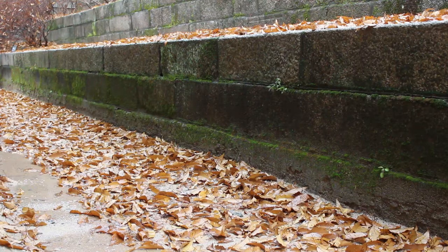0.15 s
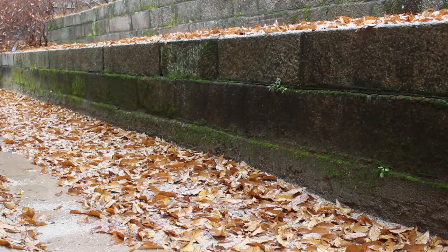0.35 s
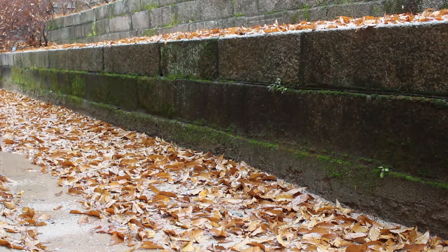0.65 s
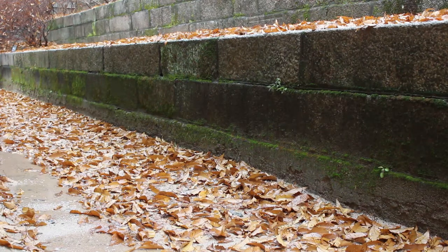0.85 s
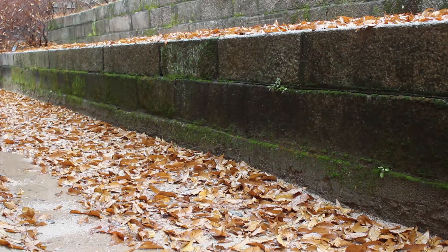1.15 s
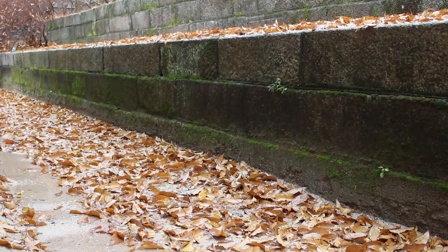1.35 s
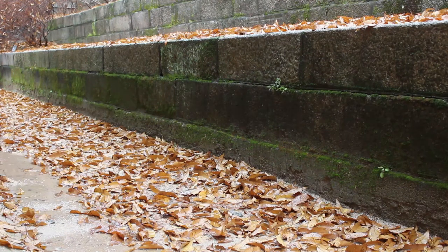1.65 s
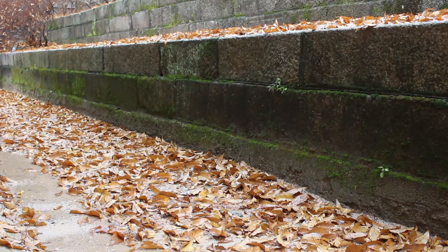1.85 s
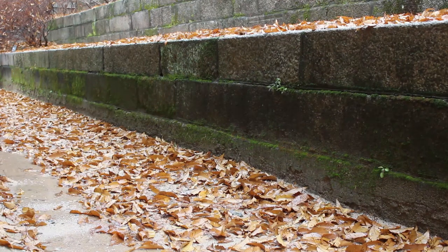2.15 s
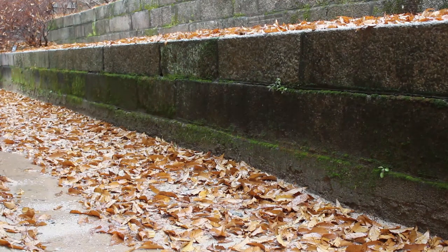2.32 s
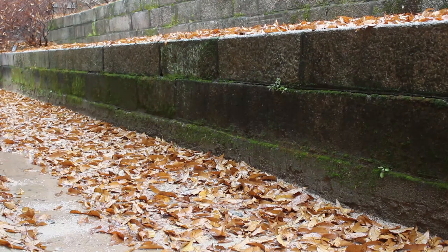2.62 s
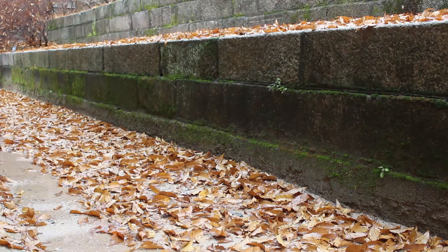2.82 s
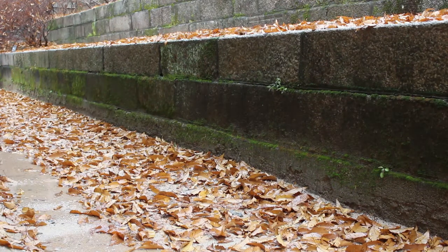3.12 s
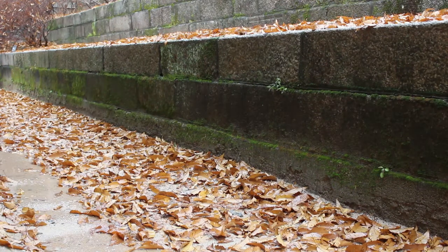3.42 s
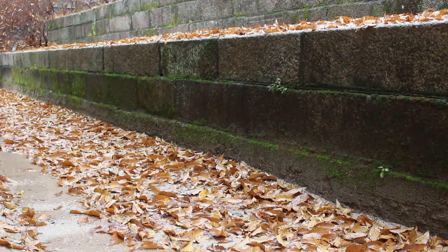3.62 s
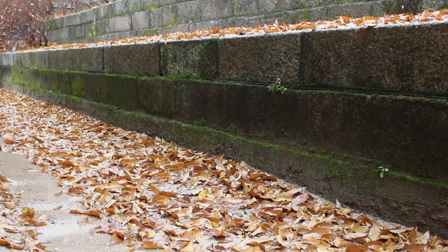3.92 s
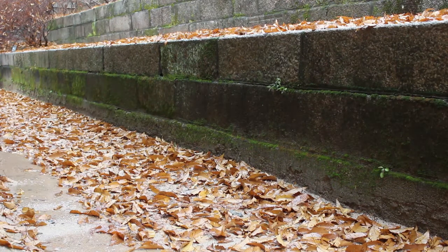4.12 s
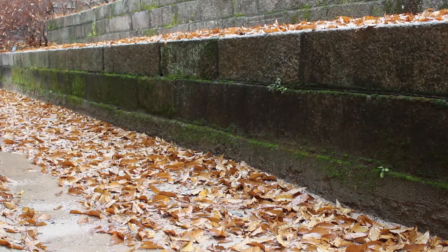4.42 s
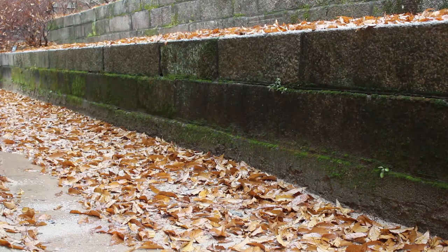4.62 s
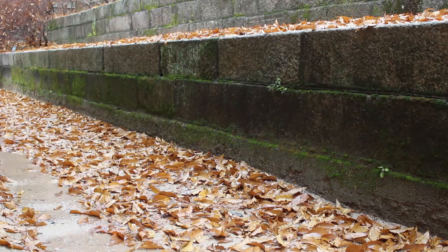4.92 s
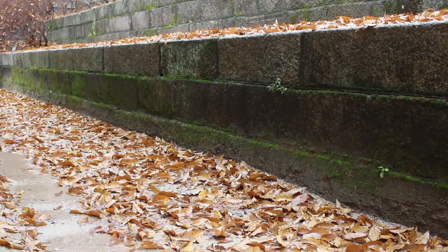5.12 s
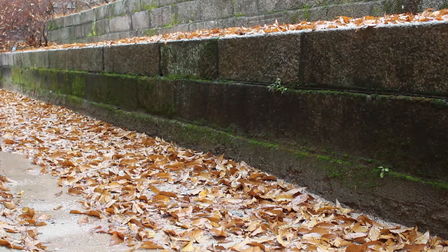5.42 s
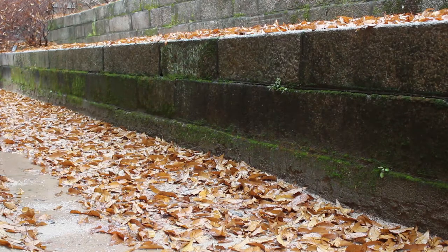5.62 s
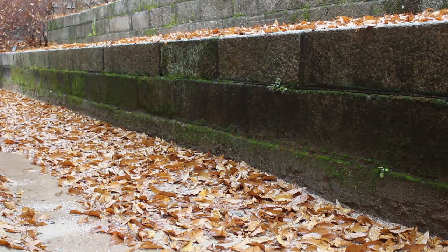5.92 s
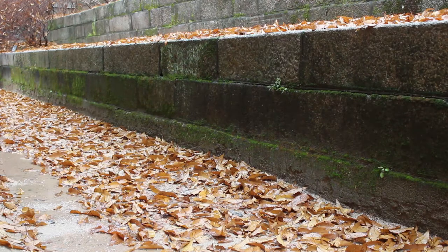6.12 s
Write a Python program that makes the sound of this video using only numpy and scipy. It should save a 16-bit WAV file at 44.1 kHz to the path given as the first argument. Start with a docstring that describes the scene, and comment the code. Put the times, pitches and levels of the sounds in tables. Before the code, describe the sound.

A quiet, steady light rain lasts just over six seconds, a soft muffled wash with fine patter. Close drops tap wet leaves and plop in shallow water at uneven intervals, each very short and dry. Around 0.6-0.9 s a bird gives two soft, slightly sinking whistles, followed by high rising chirps until 1.4 s, while a firmer drop lands at 1.35 s. From 1.75 to 4.1 s a hoarse, rising churr repeats among quick slurred chirps, echoing from trees, as flurries of droplets spatter the litter from about 2 s. The loudest smack comes at 3.2 s, another plop at 3.5 s. Brighter chirps cluster at 4.6-5 s, strongest first. Heavy drops hit at 5.2 and 5.4 s; one last chirp follows at 5.55 s, then scattered drips and small spatters. Faint low air rumble and hiss lie beneath; the courtyard adds short dull reflections, almost mono.

```python
"""Light rain in a stone courtyard strewn with wet leaves: fat drops smack on leaves and puddles close by.
Fine rain patters all round, showers of droplets spatter the litter and birds call from echoing trees.
Drops are impacts that excite damped resonances; the rain is shaped noise and random ticks.
The birds are gliding sines with a random quaver. Low rumble and faint hiss lie beneath; it is almost mono."""
import sys
import numpy as np
from scipy import signal
from scipy.fft import rfft, irfft, next_fast_len
from scipy.io import wavfile

SR = 44100
rng = np.random.default_rng(int(sys.argv[2]) if len(sys.argv) > 2 else 0)


def materialize(psi):
    """Save the field psi as 16-bit PCM at rate SR to the path in sys.argv[1].

    A 1-D psi becomes a single channel; in a 2-D psi each row is a channel.
    """
    bounded = np.clip(np.atleast_2d(psi).T, -1, 1)
    quanta = np.round(bounded * 32767).astype(np.int16)
    wavfile.write(sys.argv[1], SR, quanta)


N = 276066
TIME = np.arange(N) / SR


def from_db(db):
    """Decibels to gain."""
    return 10 ** (np.asarray(db) / 20)


def rms_one(x):
    """Scale to rms 1."""
    return x / np.sqrt(np.mean(x ** 2) + 1e-20)


def unit_energy(x):
    """Scale a short sound to energy 1."""
    return x / np.linalg.norm(x)


def in_time(rows):
    """Each column of a curve at every sample."""
    s, *columns = np.transpose(rows)
    return [np.interp(TIME, s, c) for c in columns]


def band(x, low_hz, high_hz, order=2):
    """Causal band-pass."""
    sections = signal.butter(order, [low_hz, min(high_hz, .45 * SR)], "band", fs=SR, output="sos")
    return signal.sosfilt(sections, x + 1e-18)


def resonate(x, hz, width_hz):
    """A two-pole resonance with gain about 1 at its peak."""
    r = np.exp(-np.pi * width_hz / SR)
    zeros = np.array([1, 0, -1]) * (1 - r * r) / 2
    poles = [1, -2 * r * np.cos(2 * np.pi * hz / SR), r * r]
    return signal.lfilter(zeros, poles, x + 1e-18)


def coloured(x, spectrum):
    """Filter a sound by a smooth curve over log frequency; rms 1."""
    hz, db = np.transpose(spectrum)
    size = next_fast_len(N)
    bins = np.maximum(np.fft.rfftfreq(size, 1 / SR), 1)
    gain = from_db(np.interp(np.log(bins), np.log(hz), db))
    return rms_one(irfft(rfft(x, size) * gain, size)[..., :N])


def wander(count, rate):
    """Random motion in straight lines between normal draws, `rate` draws a second."""
    knots = np.arange(count) * rate / SR
    return np.interp(knots, np.arange(count), rng.standard_normal(count))


def add(out, s, sound):
    """Mix a sound in at a time."""
    start = max(round(s * SR), 0)
    out[start:start + len(sound)] += sound[:max(N - start, 0)]


def reverb(x, t60, low_hz, high_hz, build_s):
    """Diffuse scatter: a noise tail of unit energy that builds up and dies away."""
    t = np.arange(SR) / SR
    noise = band(rng.standard_normal(SR), low_hz, high_hz, order=1)
    tail = noise * from_db(-60 * t / t60) * (1 - np.exp(-t / build_s))
    return signal.fftconvolve(x, unit_energy(tail))[:N]


def courtyard(x):
    """Ground and wall send back dull early echoes, then a faint tail."""
    # reflections from ground and wall: (delay [s], level [dB])
    echoes = [(.0048, -17.5), (.0095, -14.5)]
    dull = band(x, 470, 2040)
    early = sum(from_db(db) * np.interp(TIME - delay, TIME, dull, left=0) for delay, db in echoes)
    tail = from_db(-25.5) * reverb(x, t60=0.33, low_hz=500, high_hz=4500, build_s=0.026)
    return x + early + tail


def hiss():
    """A faint treble-heavy noise, with opposite polarity in the two channels."""
    # spectrum of the hiss: (frequency [Hz], relative level [dB])
    hiss_colour = [(2000, -21), (5000, -25), (8000, 3), (12000, 3), (16000, 3.5)]
    return from_db(-64.0) * coloured(rng.standard_normal(N), hiss_colour) * np.array([[1], [-1]])


def air_rumble():
    """Air moving past the microphone makes a low noise that swells and sinks."""
    # strength of the moving air: (time [s], level before a steady lift [dB])
    air = [(0.0, -65), (1.24, -49.5), (2.16, -58), (3.49, -57.5), (3.57, -46), (4.01, -53.5), (4.73, -54),
           (4.78, -49), (4.9, -53.5), (5.32, -54), (5.51, -61.5), (6.26, -55)]
    # spectrum of the rumble: (frequency [Hz], relative level [dB])
    rumble_colour = [(15, 1), (28, 3), (52, 0.5), (75, -3.5), (120, -21.5), (220, -45.5)]
    rumble_db, = in_time(air)
    return from_db(rumble_db + 2.5) * coloured(rng.standard_normal(N), rumble_colour)


def patter(per_s, spread_db, low_hz, high_hz, q, count=16):
    """Small drops fall at random, each a click that rings briefly on one of a set of damped leaves."""
    sizes = from_db(spread_db * np.minimum(rng.exponential(1, N), 3.5)) * rng.choice([-1, 1], N)
    clicks = sizes * (rng.random(N) < per_s / SR)
    leaf = rng.integers(0, count, N)
    pitches = np.geomspace(low_hz, min(high_hz, .4 * SR), count)
    ticks = sum(resonate(clicks * (leaf == k), hz, hz / q) for k, hz in enumerate(pitches))
    return rms_one(ticks + from_db(-15.0) * clicks)


def rain():
    """Far rain merges to a wash of noise; nearer drops stay apart as a fine patter."""
    # the surrounding rain: (time [s], level shared by wash and patter before their mix [dB])
    rainfall = [(0, -45), (.5, -46.5), (1.1, -45), (1.9, -45.5), (2.5, -45.5), (2.95, -44), (3.35, -46.5),
                (3.8, -43.5), (4.4, -45), (4.85, -43.5), (5.35, -45.5), (5.9, -46), (6.26, -45.5)]
    # spectrum of the rain: (frequency [Hz], relative level [dB])
    rain_colour = [(59, -61), (100, -4.5), (166, -7), (271, -8.5), (381, -0.5), (513, -1), (648, -1),
                   (930, -2), (1390, -2), (1650, -7.5), (3120, -11.5), (5300, -13), (6420, -19.5),
                   (14400, -27), (16000, -29)]
    rain_db, = in_time(rainfall)
    wash = coloured(rng.standard_normal(N), rain_colour)
    ticks = courtyard(patter(per_s=260, spread_db=4.5, low_hz=414, high_hz=12500, q=1.7))
    grains = coloured(ticks, rain_colour)
    return from_db(rain_db) * (from_db(0.67) * wash + from_db(-5.0) * grains)


def song(notes, quaver_hz=380, quaver_rate=900, flutter_db=2.5, second_db=-4.0, second_voice_ratio=1.13):
    """Whistled glides; hoarseness adds a fast quaver and a second voice from the other side of the syrinx."""
    out = np.zeros(N)
    quaver, flutter = wander(N, quaver_rate), wander(N, 90)
    for s, length, start_hz, end_hz, db, hoarse in notes:
        inside = (TIME >= s) & (TIME < s + length)
        u = (TIME[inside] - s) / length  # progress through the note, 0-1
        pitch = start_hz + (end_hz - start_hz) * u + hoarse * quaver_hz * quaver[inside]
        phase = 2 * np.pi * np.cumsum(pitch) / SR
        swell = np.minimum(1, np.minimum(5 * u, 8 * (1 - u))) * from_db(flutter_db * flutter[inside])
        second_voice = hoarse * from_db(second_db) * np.sin(second_voice_ratio * phase)
        out[inside] += from_db(db) * rms_one(swell * (np.sin(phase) + second_voice))
    return out


def whistling_bird():
    """A bird gives two soft whistles that sink in pitch."""
    # whistles: (time [s], start pitch [Hz])
    whistles = [(.61, 1665), (0.77, 1597)]
    length_s, sag_hz, level_db, hoarseness = 0.13, 50, -48.5, .25
    return song([(s, length_s, hz, hz - sag_hz, level_db, hoarseness) for s, hz in whistles])


def churring_bird():
    """A second bird repeats one hoarse rising churr."""
    # churrs: (time [s], level before the trees [dB])
    churrs = [(1.746, -47.5), (1.97, -46.5), (2.24, -47.5), (2.56, -46), (2.83, -47.5), (3.07, -54),
              (3.401, -51), (3.785, -47), (4.051, -49)]
    length_s, start_hz, end_hz, hoarseness = 0.0802, 2200, 2558, 0.934
    return song([(s, length_s, start_hz, end_hz, db, hoarseness) for s, db in churrs])


def chirping_bird():
    """A songbird gives high slurred chirps, most of them rising."""
    # (time [s], length [s], start pitch [Hz], end pitch [Hz], level before the trees [dB], hoarseness [ratio])
    chirps = [(.845, .11, 3560, 5000, -52, 0.5), (1.05, 0.099, 3870, 5790, -49.5, .55),
              (1.15, .09, 4300, 5640, -52, 0.65), (1.295, 0.14, 4570, 6300, -55.5, 0.76),
              (1.761, 0.095, 5050, 5530, -53.5, 0.86), (2.305, 0.066, 5610, 4680, -44.5, 1.1),
              (2.418, 0.11, 4610, 6000, -49, .4), (2.54, 0.16, 5660, 5920, -53, 0.86),
              (2.60, 0.08, 4280, 5180, -48, 1.07), (2.755, 0.095, 4140, 4500, -49.5, 0.78),
              (2.87, 0.027, 5000, 6000, -44.5, 1), (3.042, 0.043, 4270, 5690, -45, 0.1),
              (3.15, 0.05, 6070, 5120, -48, 0.6), (3.42, 0.101, 5210, 5440, -47, 1.07),
              (3.809, 0.046, 5070, 6020, -48, 0.92), (4.044, 0.069, 4900, 5920, -50.5, 1),
              (4.62, .058, 3860, 5630, -39, .55), (4.72, 0.072, 4120, 5500, -47.5, .8),
              (4.862, 0.05, 3990, 5670, -43.5, 0.77), (4.96, 0.06, 4070, 5190, -48.5, 0.57),
              (5.555, 0.1, 3685, 5630, -45.5, 0.76)]
    return song(chirps)


def birds():
    """Three birds call; their notes ring on among the trees."""
    calls = chirping_bird() + churring_bird() + whistling_bird()
    near_trees = from_db(-7) * reverb(calls, t60=.2, low_hz=1000, high_hz=11000, build_s=.003)
    far_trees = from_db(-2.5) * reverb(calls, t60=.65, low_hz=1000, high_hz=11000, build_s=.03)
    return from_db(-1.5) * calls + near_trees + far_trees


def showers(clump_db=4.0):
    """Droplets shaken from the branches spatter the litter in uneven flurries of varying brightness."""
    # flurries: (time [s], length [s], relative peak level [dB], treble gain [dB])
    flurries = [(0.93, .10, -65, 11), (2.026, 0.34, -46, 10), (2.308, 0.35, -44, -31),
                (2.73, 0.36, -44, -3), (2.998, 0.39, -41, -1.5), (3.37, 0.27, -48, -16),
                (3.557, 0.41, -46.5, 9), (4.012, 0.25, -48, -19), (4.524, 0.17, -41.5, 6),
                (5.51, 0.079, -40, -17), (5.99, 0.087, -39.5, -10)]
    # spectrum of the spatter: (frequency [Hz], relative level [dB])
    shower_colour = [(600, -16), (1500, 13.5), (3000, 10), (5000, 15.5), (7500, 6), (10000, -4.5),
                     (13000, -15), (16000, -20)]
    ticks = courtyard(patter(per_s=2800, spread_db=-1.0, low_hz=940, high_hz=15300, q=3.2))
    spatter = coloured(ticks, shower_colour)
    body, treble = band(spatter, 300, 4140), band(spatter, 7320, 13100)
    out = 0
    for s, length, db, treble_db in flurries:
        # a faint trickle of droplets goes on before and after each flurry
        flurry = np.interp((TIME - s) / length, [0, .25, .6, 1.15], [0.028, 1.0, 0.68, 0.012])
        out = out + from_db(db) * flurry * (body - from_db(treble_db) * treble)
    return from_db(1.0 + clump_db * wander(N, 110)) * out


def drop(plop_db, plop_hz, slap_db, slap_hz, spray_db, share, noise,
         splash_s=0.0028, scatter_db=-9.0, scatter_t60=0.11):
    """A sharp impact and a brief splash make the water plop, slap a leaf and throw spray."""
    puddle_q = 1.31  # the water under the leaves answers with one dull plop
    wet_leaf_q = 3.08  # a wet leaf is heavily damped: it rings for only a few cycles
    spray, litter = noise
    t, share = np.arange(len(spray)) / SR, np.clip(share, 0, 1)
    splash = spray * np.exp(-t / splash_s) * (1 - np.exp(-t / 0.00054))
    blow = np.sqrt(1 - share) * (t == 0) + np.sqrt(share) * unit_energy(splash)
    # the litter round each landing spot scatters the sound in a way of its own
    scatter = litter * from_db(-60 * t / scatter_t60) * (1 - np.exp(-t / 0.0019))
    blow = blow + from_db(scatter_db) * band(unit_energy(scatter), 400, 13000, order=1)
    # the surface yields, which spreads the impact in time (an allpass), and then rings briefly
    blow = blow - 2 * resonate(blow, 10000, 3000)
    hit = from_db(spray_db) * unit_energy(band(blow, 2000, 10300, order=1))
    for db, hz, q in (plop_db, plop_hz, puddle_q), (slap_db, slap_hz, wet_leaf_q):
        ring = resonate(blow, hz, hz / q)
        hit = hit + from_db(db) * unit_energy(band(ring, hz / 3.2, hz * 3.22))
    window = .006 * SR  # part levels are rms over 6 ms, ahead of the last filter
    # a small splash radiates little bass
    return np.sqrt(window) * band(hit, 284, 14000)


def small_drops(count=14, size=4096):
    """Lighter drops fall at random times, in water and on leaves of random pitch."""
    level_db, spread_db, spray_db = -49, 2.0, 5  # the spray is relative to the drop
    out = np.zeros(N)
    draws, noises = rng.random((count, 5)), rng.standard_normal((count, 2, size))
    for (when, depth, leaf, weight, share), noise in zip(draws, noises):
        db = level_db + spread_db * (2 * weight - 1)
        plop_hz = np.interp(depth, [0, 1], (550, 1600))
        slap_hz = np.interp(leaf, [0, 1], (2500, 5500))
        add(out, when * N / SR, drop(db, plop_hz, db, slap_hz, db + spray_db, share, noise))
    return out


def stiff_leaves(size=8192):
    """A stiff leaf shivers on in a narrow band after it is struck."""
    # struck leaves: (time [s], pitch [Hz], level as rms over 6 ms [dB], decay by 60 dB [s])
    leaves = [(0.1, 5300, -33, 0.038), (.336, 10200, -48, 0.25), (3.224, 2200, -21, 0.15),
              (4.191, 7350, -28, 0.018), (6.139, 2610, -23, 0.0073)]
    stiff_leaf_q = 8.0
    out, t = np.zeros(N), np.arange(size) / SR
    window = .006 * SR
    for (s, hz, db, t60), noise in zip(leaves, rng.standard_normal((len(leaves), size))):
        shiver = resonate(noise * from_db(-60 * t / t60), hz, hz / stiff_leaf_q)
        add(out, s, from_db(db) * np.sqrt(window) * unit_energy(resonate(shiver, hz, hz / 2)))
    return out


def near_drops(size=4096):
    """Fat drops from the trees land close to the microphone."""
    # (time [s], plop level [dB], plop pitch [Hz], slap level [dB], slap pitch [Hz], spray level [dB],
    #  splash share of the impact energy [0-1])
    landings = [(.0989, -49, 450, -32, 4100, -55, 0.77), (0.1366, -29, 780, -35, 8260, -47, 0.15),
                (.272, -44, 2000, -41.5, 3270, -38, 0.3), (0.3347, -40, 1310, -36, 8500, -29.5, 0.4),
                (.476, -39, 1040, -34.5, 4500, -59, 0.86), (.6534, -47, 1600, -43.5, 5960, -51, 0.5),
                (.7077, -39, 1730, -31.5, 3400, -53, .4), (.785, -42, 590, -40, 3460, -41.5, 0),
                (0.9351, -45, 550, -35.5, 5140, -57, 0.7), (0.9638, -37.5, 453, -45, 3340, -35, 0.5),
                (0.9938, -44, 450, -38, 3200, -41, 0.7), (1.129, -32, 895, -39, 3900, -47, 0.9),
                (1.255, -38, 450, -31.5, 2000, -60, .6), (1.3492, -28, 1110, -24.5, 3500, -47, 0.77),
                (1.4616, -35, 865, -35, 3570, -35.5, 1), (1.5474, -38.5, 500, -34, 3170, -47, 0.25),
                (1.602, -34, 1360, -34, 3770, -55, 0.7), (1.652, -33, 740, -34, 3870, -66, 0.9),
                (1.8823, -31, 650, -35, 3640, -39, .25), (2.0629, -45, 450, -37, 4500, -53, 0.15),
                (2.2023, -31, 448, -43, 3700, -29, 0.45), (2.2451, -43, 620, -39, 2000, -35.5, .8),
                (2.4163, -45, 600, -37, 3600, -41, 1), (2.476, -43, 730, -32.5, 2900, -66, 0.9),
                (2.691, -41.5, 536, -35.5, 4350, -52, .5), (2.7763, -37, 750, -33.5, 3980, -55, 0.02),
                (3.041, -30.5, 1680, -37.5, 5700, -57, 0.25), (3.1192, -50, 450, -31.5, 9600, -32.5, .1),
                (3.1644, -34.5, 570, -56, 3600, -44, 0.2), (3.2222, -15, 1820, -17.5, 3420, -39, 0.1),
                (3.5116, -20.5, 1260, -50, 4220, -57, 0.01), (3.5215, -25.5, 1320, -38, 3400, -58, .75),
                (3.65, -50, 1900, -36.5, 4750, -58, .6), (4.0436, -33, 1450, -46, 2400, -58, .7),
                (4.155, -41, 650, -32, 2340, -33, 0.3), (4.19, -38.5, 450, -29.5, 4050, -31.5, 0.2),
                (4.248, -39, 940, -35.5, 2670, -50, 0.5), (4.3141, -35, 1250, -45, 4100, -54, 0.7),
                (4.4911, -38, 760, -34, 3300, -40, 0.6), (4.5004, -34, 1170, -32, 4070, -35.5, 0.3),
                (5.0572, -31.5, 1030, -38, 12500, -33, 0.1), (5.0814, -36, 1180, -32, 4120, -53, 0.6),
                (5.1887, -38, 1410, -28, 2000, -46, .15), (5.2011, -36, 520, -19.5, 2750, -29, .35),
                (5.4155, -18, 1120, -26.5, 2950, -46, .08), (5.965, -32, 920, -39, 4550, -55, .4),
                (5.9774, -34, 1100, -44, 3000, -60, 0.7), (6.1395, -29, 750, -26.5, 2400, -68, 0.2)]
    out = np.zeros(N)
    for (s, *shape), noise in zip(landings, rng.standard_normal((len(landings), 2, size))):
        add(out, s, drop(*shape, noise))
    return out


def scene():
    """All sources reach both channels alike; only a faint hiss differs between them."""
    drops_and_leaves = courtyard(near_drops() + stiff_leaves() + small_drops())
    return drops_and_leaves + rain() + showers() + birds() + air_rumble() + hiss()


def record(dry):
    """Peaks are clipped at 0.92 of full scale, then a steep low-pass cuts the top."""
    held = np.clip(dry, -.92, .92)
    cutoff_hz = 16000
    return signal.sosfilt(signal.ellip(10, .1, 80, cutoff_hz, fs=SR, output="sos"), held)


dry = scene()
out = record(dry)
materialize(out)
```